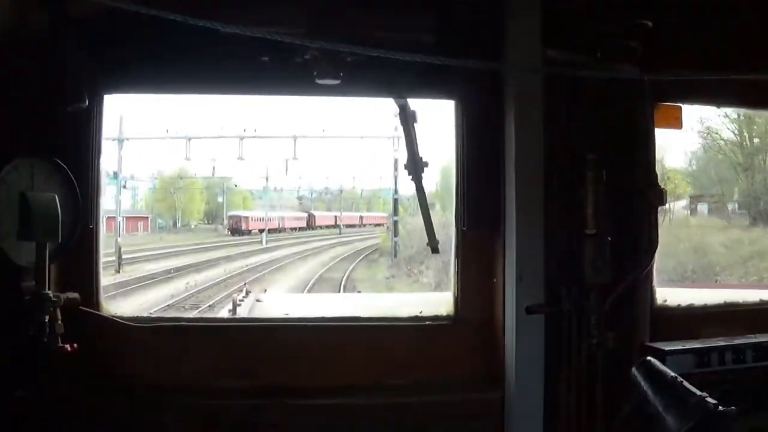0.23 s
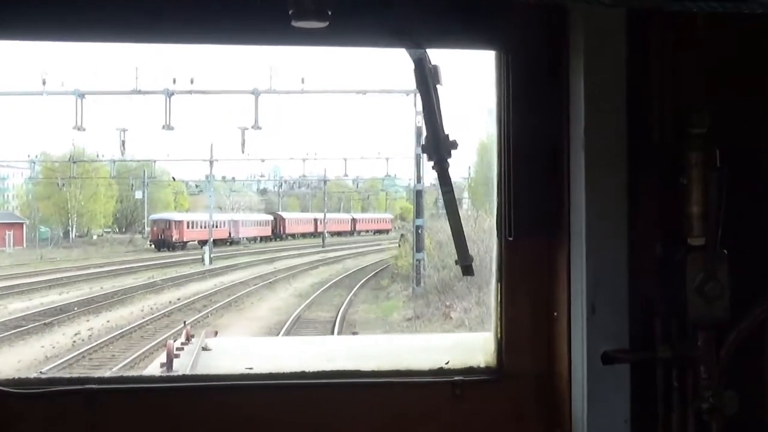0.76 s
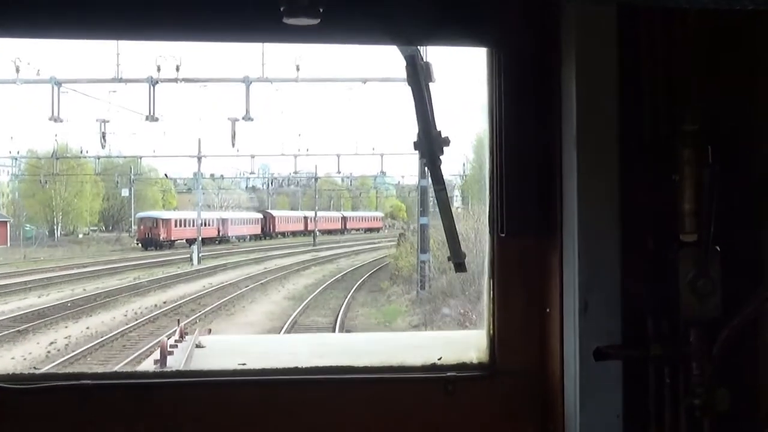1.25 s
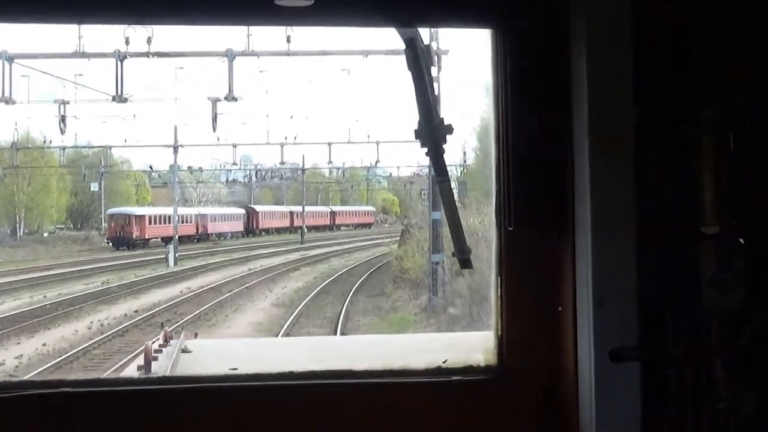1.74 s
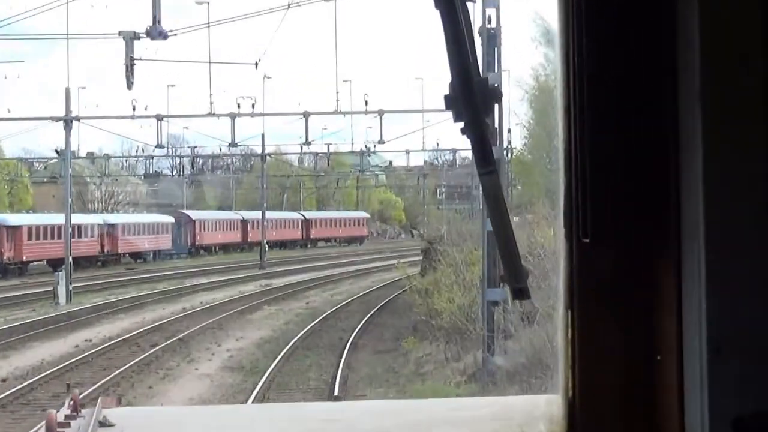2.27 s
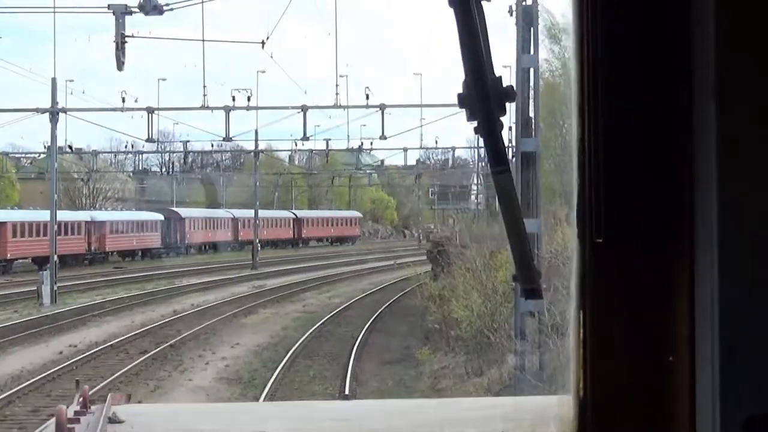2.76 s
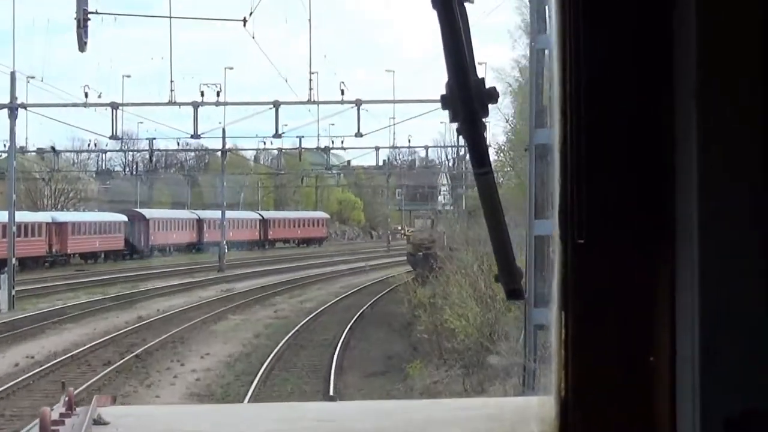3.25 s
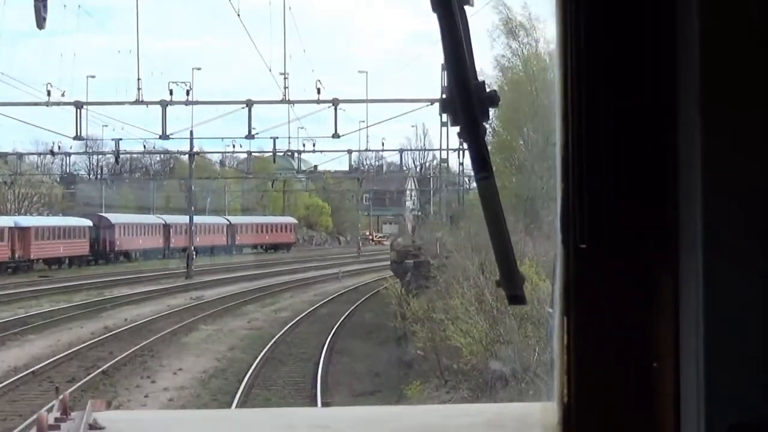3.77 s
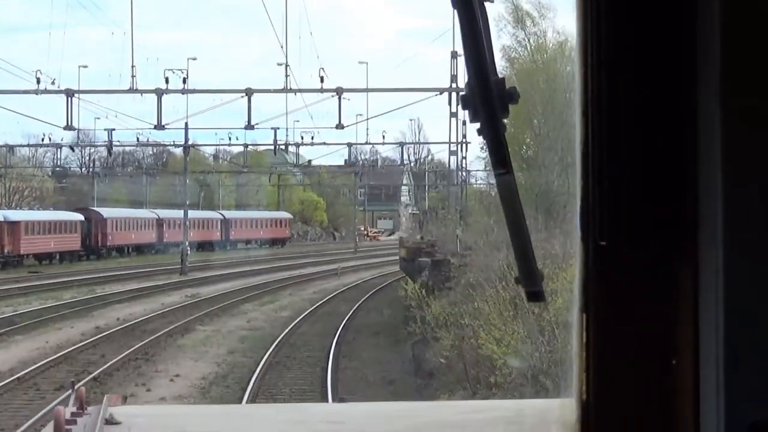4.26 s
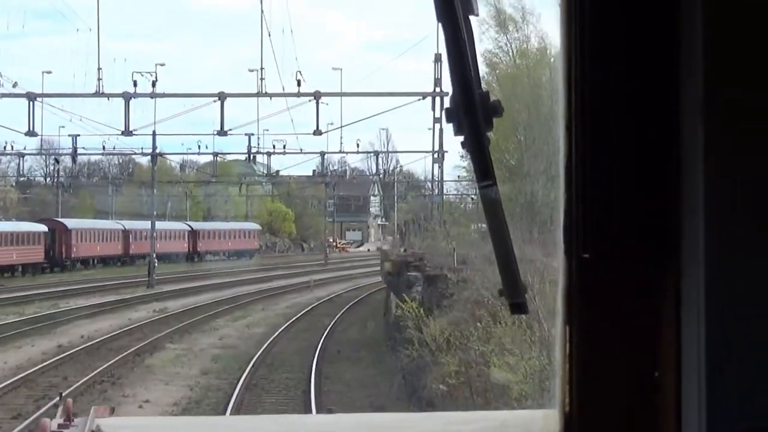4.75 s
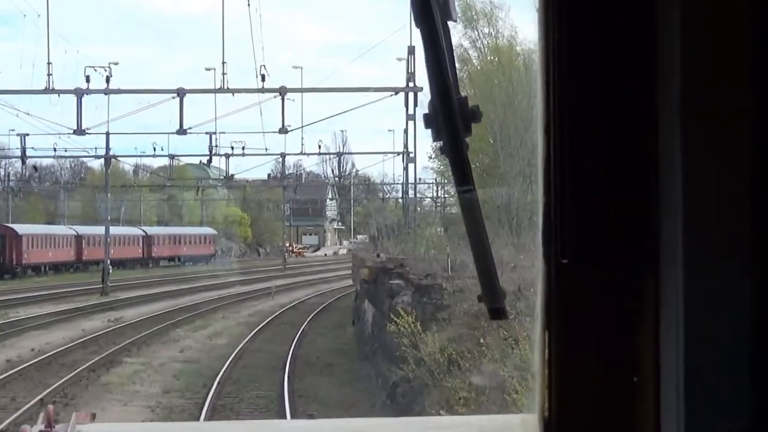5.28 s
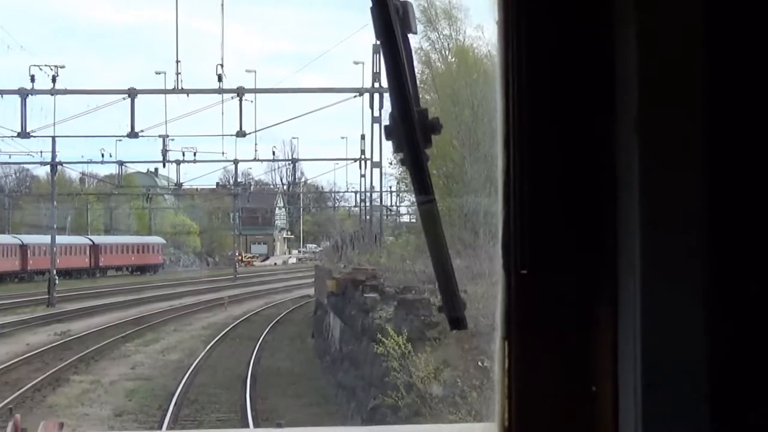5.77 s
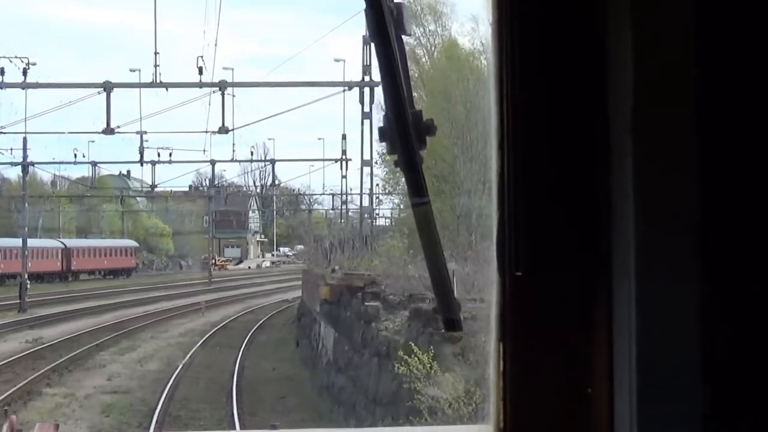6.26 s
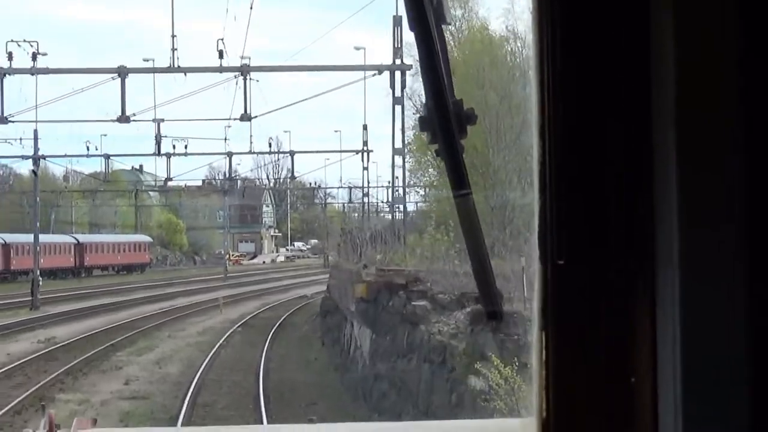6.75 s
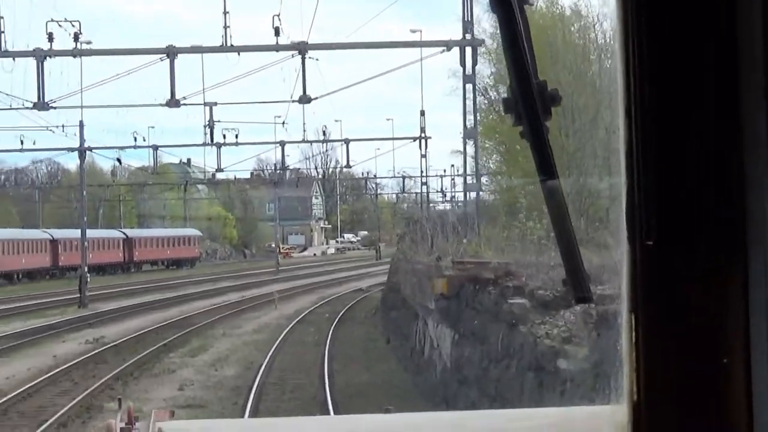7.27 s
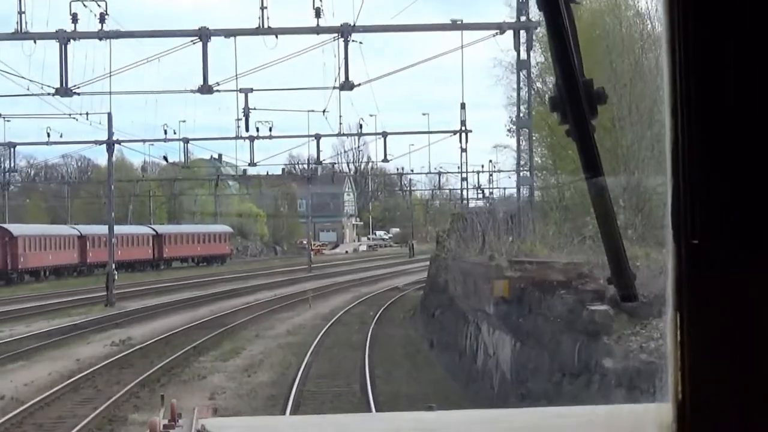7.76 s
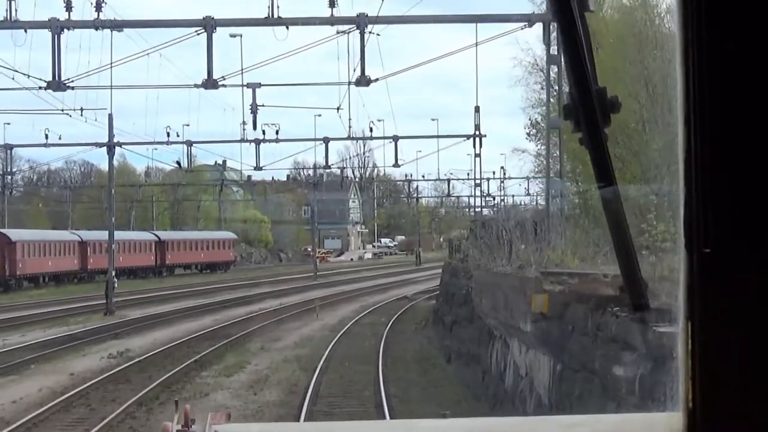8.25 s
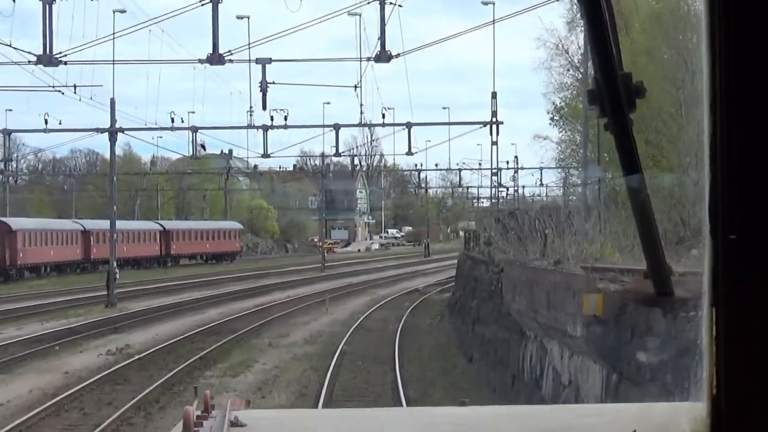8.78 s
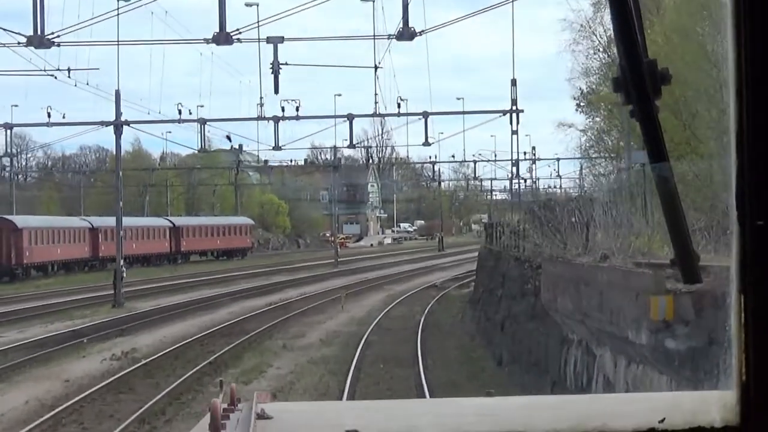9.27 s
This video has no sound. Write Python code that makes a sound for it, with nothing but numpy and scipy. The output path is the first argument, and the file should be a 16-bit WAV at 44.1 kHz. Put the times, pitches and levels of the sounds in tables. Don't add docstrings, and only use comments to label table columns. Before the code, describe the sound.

Constant rough fan roar fills a steel train cab, with a high steady whine, deep faint track rumble and a few hissing air bursts.

```python
import sys
import numpy as np
from scipy import signal
from scipy.fft import rfft, irfft, next_fast_len
from scipy.io import wavfile
from scipy.ndimage import uniform_filter1d, map_coordinates

SR = 44100
rng = np.random.default_rng(int(sys.argv[2]) if len(sys.argv) > 2 else 0)


def boost(x):
    u = np.asarray(x, float) / 20
    return 10 ** u


def master(y):
    cut = np.clip(np.atleast_2d(y).T, -1, 1)
    pcm = np.round(cut * 32767)
    wavfile.write(sys.argv[1], SR, pcm.astype(np.int16))


N = 419832
TIME = np.arange(N) / SR


def unit(x):
    return x / np.sqrt(np.mean(x ** 2) + 1e-20)


def along(points, hz):
    f, v = np.transpose(points)
    return np.interp(np.log(hz + 1), np.log(f + 1), v)


def curve(points):
    s, v = np.transpose(points)
    return np.interp(TIME, s, v)


def wobble(rate):
    knots = rng.standard_normal(int(N * rate / SR) + 4)
    return map_coordinates(knots, [np.arange(N) * rate / SR])


def filtered(x, response):
    m = next_fast_len(N + SR // 2)
    return irfft(rfft(x, m) * response(np.fft.rfftfreq(m, 1 / SR)), m)[..., :N]


def peak(f, hz, width):
    return 1 / (1 + (2 * (f - hz) / width) ** 2) ** 1.31


def rush(gain, patchy_db, alike=None):
    # (frequency [Hz], likeness [0-1])
    likeness = [(25, .985), (60, 0.89), (290, 0.46), (640, 0.6), (1410, 0.73), (3100, 0.68), (6000, .76),
                (8500, 0.88), (10500, 0.96), (15000, 0.92)]
    if alike is None:
        alike = lambda hz: along(likeness, hz)
    z = signal.stft(rng.standard_normal((2, N)), nperseg=512)[2]
    patches = uniform_filter1d(rng.standard_normal(z.shape[1:]), size=8, axis=0)
    patches = uniform_filter1d(patches, size=12, axis=1)
    pair = signal.istft(z * boost(patchy_db * unit(patches)), nperseg=512)[1][:, :N]

    def mid_side_share(hz):
        angle = np.arccos(np.clip(alike(hz), -1, 1)) / 2
        return np.array([np.cos(angle), np.sin(angle)])

    mid, side = filtered(pair, mid_side_share)
    return unit(filtered(np.array([mid + side, mid - side]), gain))


def fans():
    # (frequency [Hz], width [Hz], level [dB], left-right [dB], likeness [0-1])
    cab_modes = [(66.8, 5, -8.5, 0.5, .96), (76.3, 17.6, -12.5, -1, 1), (100, 13, -14.5, -0.5, 0.96),
                 (133.4, 21, -16.5, 1, 0.93), (166, 18, -10, -0.5, 1), (199.7, 21.6, -5.5, 2, 0.95),
                 (228, 21, -11.5, -1, 0.9), (264, 35, -13.5, 6, 0.53), (289.5, 20, -11, 3, .7),
                 (310.4, 8, -5, -3, 0.5), (323.5, 12, -0.5, 0.5, 0.8), (327.3, 8.6, -5, 3, 0.8),
                 (343.6, 4.9, -7.5, 11, 0), (381.4, 20.7, -8, 3, 0.88), (418, 35, -18.5, -5, 0.3),
                 (480.7, 31, -13.5, 0.5, 0.98), (592, 85, -18.5, -1.5, 0.75)]
    # (frequency [Hz], width [Hz], level change [dB])
    duct_peaks = [(955, 44, 4), (1040, 30, 2.5), (1160, 33, 2.5), (1246, 17, -6.5)]
    # (frequency [Hz], level per Hz [dB])
    roar_color = [(240, -16), (400, -4), (435, -12), (484, -3), (678, -5.5), (982, -6.5), (1610, -14),
                  (1760, -16.5), (1890, -15.5), (5000, -36.5), (6500, -49), (11000, -120)]
    # (frequency [Hz], left-right [dB])
    roar_lean = [(60, 0.0), (110, 0.0), (200, -26), (380, -0.5), (700, 3.5), (1290, 0), (2380, 0.5),
                 (4400, 0.5), (8120, -4), (15000, 0.0)]
    # (frequency [Hz], level per Hz [dB])
    hiss_color = [(2060, -10), (3500, -5), (3800, -4.5), (5900, -6), (9420, -5), (13900, -17), (14800, -17),
                  (15500, -24)]
    sides = np.array([[.5], [-.5]])

    def cab(f):
        return np.sqrt(sum(boost(2 * (db + pan * sides)) * peak(f, hz, width)
                           for hz, width, db, pan, _ in cab_modes))

    def cab_alike(f):
        powers = [boost(2 * db) * peak(f, hz, width) for hz, width, db, _, _ in cab_modes]
        shared = sum(power * np.clip(mode[4], 0, 1) for power, mode in zip(powers, cab_modes))
        return shared / sum(powers)

    def duct(f):
        bumps_db = sum(db * peak(f, hz, width) for hz, width, db in duct_peaks)
        return boost(along(roar_color, f) + sides * along(roar_lean, f) + bumps_db)

    flow_db = -2.5 * np.exp(-TIME / 0.71)
    duct_db = flow_db + 0.075 * shaking()
    gust = wobble(18)
    boom = boost(-14.77 + flow_db) * rush(cab, patchy_db=0, alike=cab_alike)
    roar = boost(-20.62 + duct_db + 0.61 * gust) * rush(duct, patchy_db=0.32)
    hiss = boost(-40.23 + duct_db + 0.42 * gust) * rush(lambda f: boost(along(hiss_color, f)), patchy_db=0.5)
    return boom + roar + hiss


def motor():
    # (time [s], pitch [Hz])
    slot_pitch = [(0, 1726), (2.4, 1726.5), (3.7, 1728), (4.8, 1732), (6, 1734), (8.3, 1732), (9.52, 1731)]
    # (offset [Hz], level against the whine [dB])
    sidebands = [
        (-33.3, -5.5),
        (33.3, -7),
    ]
    # (time [s], left-right [dB])
    whine_pan = [(0, -3.5), (3, -10), (6, -2), (7.2, 1), (9.52, 0)]
    hz, pan_db = curve(slot_pitch), curve(whine_pan)
    faster = hz - 1730
    whine_db = -41 + 0.42 * faster
    octave_db = -63 + 2 * faster
    phase = 2 * np.pi * np.cumsum(hz) / SR
    tone = boost(whine_db - .2 + 1.1 * wobble(9)) * np.sin(phase)
    for offset, below_db in sidebands:
        lean_db = .012 * offset * faster
        side_level = boost(whine_db + below_db + lean_db + 1.3 * wobble(2.6))
        tone += side_level * np.sin(phase + 2 * np.pi * offset * TIME)
    octave = boost(octave_db + 1.3 * wobble(5.8)) * np.sin(2 * phase) * boost([[-2.5], [2.2]])
    return np.sqrt(2) * (tone * boost([pan_db / 2, -pan_db / 2]) + octave)


def valve():
    # (time [s], peak level [dB], sharpness from lower to upper band [dB])
    spits = [(0.0494, -38, -6), (0.2394, -35, -6), (0.2794, -33, -7), (2.0587, -26, -2),
             (2.0724, -29.5, -3), (2.1094, -33, 5), (2.1344, -30, 9), (2.1514, -24.5, 5), (2.1894, -35, 4),
             (2.2844, -34, -5), (3.2734, -16.5, 5), (3.5169, -23, 8), (3.5494, -29, -8), (3.5894, -34, 2),
             (3.6294, -32, 2), (3.6694, -32, -1), (3.7094, -33, -2), (6.2781, -37, -2)]
    # (frequency [Hz], width [Hz], level [dB])
    nozzle = [
        [(6330, 3400, 0)],
        [(3500, 2600, 0)],
        [(9830, 3000, 14), (13000, 4000, 1)],
    ]
    # (middle [s], lower [s], upper [s])
    spit_decay = (.14, .15, .11)
    flow = np.zeros((3, N + SR))
    t = np.arange(SR // 2) / SR
    for s, db, sharp_db in spits:
        puff = boost(db - 60 * t / np.reshape(spit_decay, (-1, 1))) * (1 - np.exp(-t / .004))
        start = round(s * SR)
        flow[:, start:start + len(t)] += puff * boost([[0], [-3 - sharp_db], [-1.5 + 0.68 * sharp_db]])
    flow = flow[:, :N] * boost(1.2 * wobble(160))

    def band(modes):
        def color(f):
            return np.sqrt(sum(boost(2 * db) * peak(f, hz, width) ** 2 for hz, width, db in modes))
        return rush(color, patchy_db=0.5)

    return boost(-7) * sum(strength * band(modes) for strength, modes in zip(flow, nozzle))


def draught():
    # (time [s], level [dB], half length [s])
    gust_push = (8.32, -28, 0.071)
    s, db, half = gust_push
    noise = unit(filtered(rng.standard_normal(N), lambda f: peak(f, 85, 90)))
    return boost(db) * np.exp(-((TIME - s) / half) ** 2) * noise * [[1], [-1]]


def shaking():
    # (start [s], length [s], extra rumble [dB])
    stretches = [
        (3.45, 2.95, 4),
        (6.4, 1.6, -3),
    ]
    # (time [s], extra rumble [dB])
    jolts = [(.13, 4), (2.03, 4), (3.55, 2), (3.76, 3), (5.7, 3), (9.17, 4)]
    shake_db = np.zeros(N)
    for s, length, db in stretches:
        shake_db += db / 2 * (np.tanh((TIME - s) / .12) - np.tanh((TIME - s - length) / .12))
    for s, db in jolts:
        shake_db += db * np.exp(-((TIME - s) / .09) ** 2)
    return shake_db


def wheels():
    # (frequency [Hz], level per Hz [dB])
    rumble_color = [(7.1, -41), (22, -8), (38, -9), (60, -2.5), (78, -45), (130, -120)]
    return boost(-36 + shaking()) * rush(lambda f: boost(along(rumble_color, f)), patchy_db=0.5)


def streaked(x):
    # (frequency [Hz], depth [dB])
    streak_depth = [(1500, 0), (4000, 1), (8000, 2), (12000, 1), (15000, 8)]
    hz, _, z = signal.stft(x, SR, nperseg=1024)
    swell = unit(uniform_filter1d(rng.standard_normal(z.shape[1:]), size=9, axis=1))
    gain = boost(along(streak_depth, hz)[:, None] * swell)
    gain /= np.sqrt(np.mean(gain ** 2, axis=1, keepdims=True))
    return signal.istft(z * gain, SR, nperseg=1024)[1][:, :N]


def scene():
    return fans() + motor() + valve() + draught() + wheels()


def top_cut(x):
    return signal.sosfilt(signal.butter(12, 15300, fs=SR, output="sos"), x)


def record(dry):
    memory = np.exp(-1 / (.02 * SR))
    loudness = np.mean(dry ** 2, axis=0)
    power = signal.lfilter([1 - memory], [1, -memory], loudness, zi=[np.mean(dry ** 2)])[0]
    x = boost(.5) * dry * (power / np.mean(power)) ** -.4
    x = x / (1 + np.abs(x / 1.05) ** 6) ** (1 / 6)
    x = streaked(x)
    return top_cut(x)


dry = scene()
out = record(dry)
master(out)
```